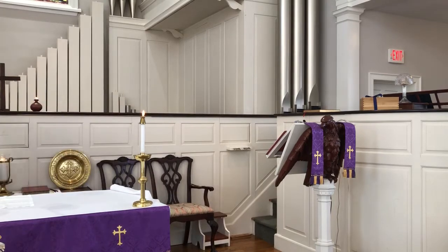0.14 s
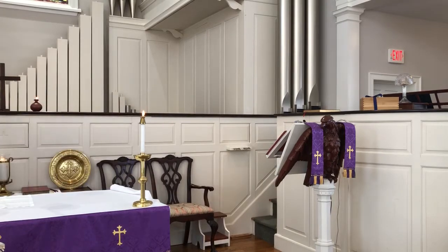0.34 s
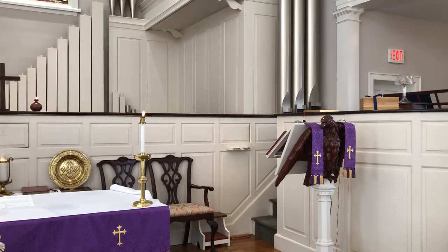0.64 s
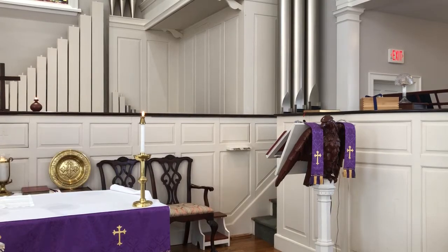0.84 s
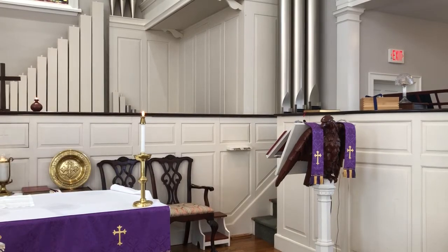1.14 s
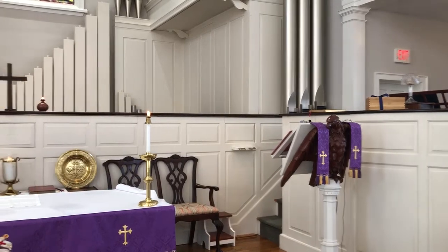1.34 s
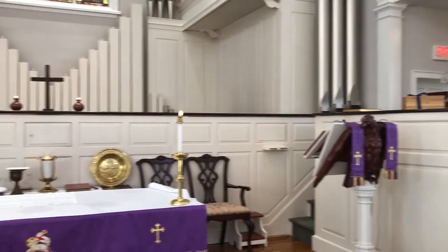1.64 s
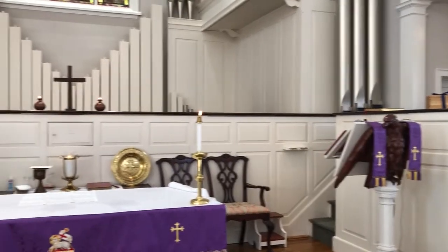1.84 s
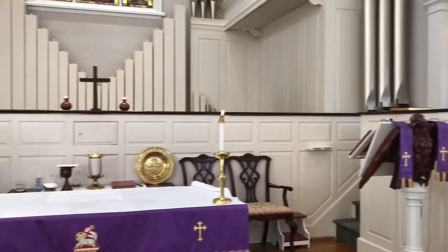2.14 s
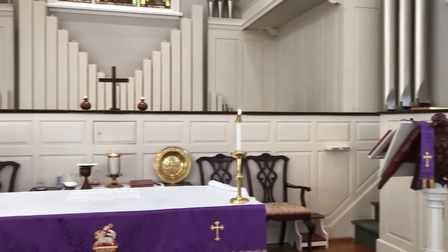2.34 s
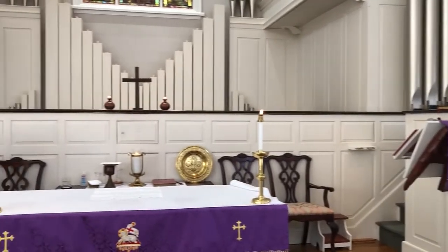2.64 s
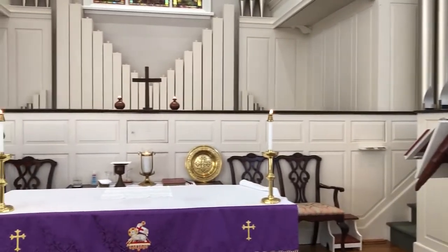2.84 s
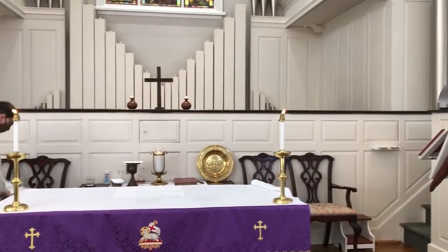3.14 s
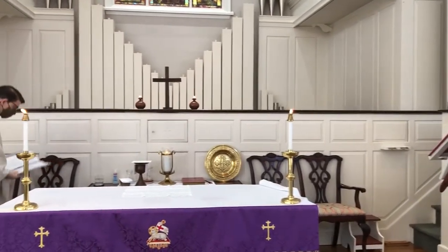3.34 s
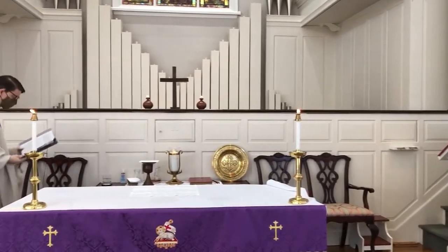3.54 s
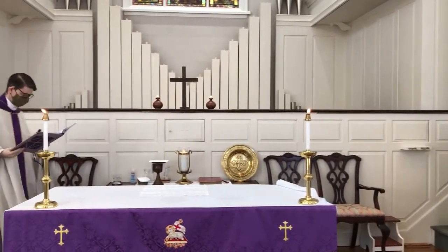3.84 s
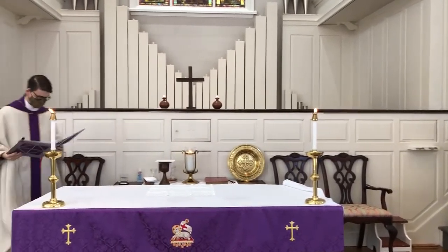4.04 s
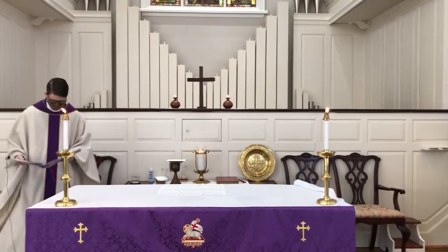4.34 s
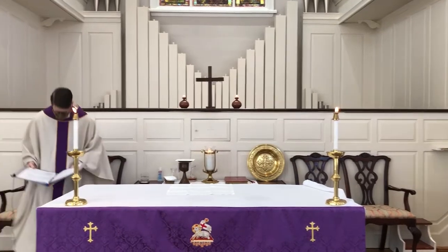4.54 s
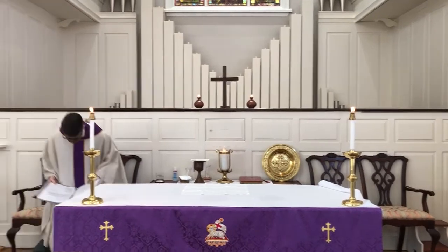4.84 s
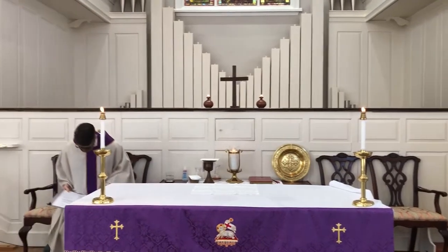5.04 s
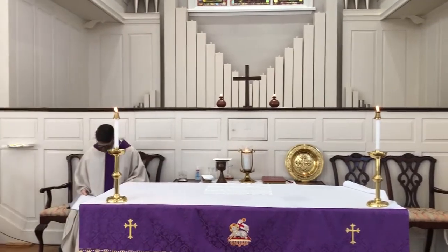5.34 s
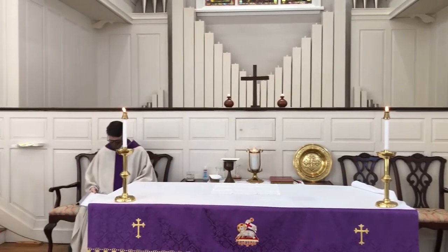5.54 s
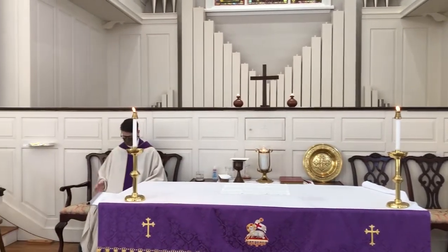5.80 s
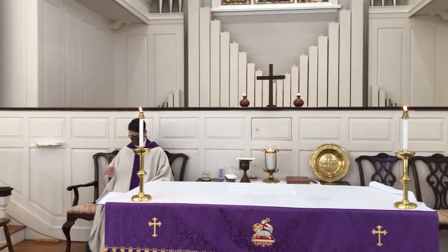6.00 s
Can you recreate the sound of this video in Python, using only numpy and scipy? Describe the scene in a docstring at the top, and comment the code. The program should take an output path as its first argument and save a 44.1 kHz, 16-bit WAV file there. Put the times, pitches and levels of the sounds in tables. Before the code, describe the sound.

In a hushed, echoing hall, a few hollow footsteps, dry handling taps and scrapes up close, then a wooden chair bump, creaks and rustling robe.

```python
"""Footsteps, a chair and a hand-held camera in a hall

Footsteps boom in a quiet hall's wooden floor, made from dying sines and short bursts of noise.
A robed person knocks a wooden chair and sits down: ringing wood, creaks, brushing cloth and paper.
Fingers tap and slide on the camera's case, made from ringing panels and grainy noise, over air and rumble.
The far sounds echo in the hall; the camera sounds stay dry. Table levels are relative: each source trims them.
"""
import sys
import numpy as np
from scipy import signal
from scipy.fft import rfft, irfft
from scipy.io import wavfile

SR = 44100
rng = np.random.default_rng(int(sys.argv[2]) if len(sys.argv) > 2 else 0)


def dump(signal):
    """Clip the signal to [-1, 1] and save it as 16-bit WAV at the path in sys.argv[1]."""
    limited = np.clip(np.atleast_2d(signal).T, -1, 1)
    pcm = np.round(limited * 32767).astype(np.int16)
    wavfile.write(sys.argv[1], SR, pcm)


N = 272052
TIME = np.arange(N) / SR  # s


def amp(db):
    """Turns decibels into a gain."""
    return 10 ** (np.asarray(db) / 20)


def unit(x):
    """Scales a sound to rms 1."""
    return x / np.sqrt(np.mean(x ** 2) + 1e-20)


def read(points, hz):
    """Reads a table between its points, along a log-frequency axis."""
    f, value = np.transpose(points)
    return np.interp(np.log(hz + 1), np.log(f + 1), value)


def add(mix, s, sound):
    """Mixes a sound in at time s, in seconds."""
    part = mix[max(round(s * SR), 0):][:len(sound)]
    part += sound[:len(part)]


def colour(x, spectrum):
    """Filters with the given spectrum, with no sound ahead of its cause (minimum phase)."""
    size = 8192
    hz = abs(np.fft.fftfreq(size, 1 / SR))
    log_gain = np.log(amp(np.maximum(read(spectrum, hz), -100)))
    response = np.exp(np.conj(signal.hilbert(log_gain)))
    taps = np.fft.ifft(response).real[:size // 2]
    return signal.fftconvolve(x, taps)[:len(x)]


def noise(spectrum):
    """Makes steady noise of rms 1 with the given spectrum."""
    gain = amp(read(spectrum, np.fft.rfftfreq(N, 1 / SR)))
    return unit(irfft(rfft(rng.standard_normal(N)) * gain, N))


def wobble(top_hz):
    """Makes a slow random curve of rms 1, fading out in pitch around top_hz."""
    gain = np.exp(-(np.fft.rfftfreq(N, 1 / SR) / top_hz) ** 2)
    return unit(irfft(rfft(rng.standard_normal(N)) * gain, N))


def ring(modes, stretch=1, tilt_db=0):
    """A struck body rings as a sum of dying sines; tilt_db brightens it, in dB per octave."""
    t = np.arange(SR * 3 // 4) / SR
    centre = np.median([mode[0] for mode in modes])
    out = 0
    for hz, db, t60 in modes:
        level_db = db + tilt_db * np.log2(hz / centre) - 60 * t / t60
        out = out + amp(level_db) * np.sin(2 * np.pi * hz * stretch * t)
    return out


def burst(spectrum, t60, clatter):
    """A contact is one sharp edge plus a dying clatter, with the energy of 3 ms at rms 1."""
    t = np.arange(SR // 3) / SR
    drive = clatter * rng.standard_normal(len(t)) * amp(-60 * t / t60)
    drive[0] += 1
    out = colour(drive, spectrum)
    return out * np.sqrt(SR * 3 // 1000) / np.linalg.norm(out)


def clicks(rows, spectrum, t60, clatter):
    """Something thin and stiff gives single sharp snaps."""
    out = np.zeros(N)
    for s, db in rows:
        add(out, s, amp(db) * burst(spectrum, t60, clatter))
    return out


def friction(per_s, spread_db, smooth):
    """Rubbing gives tiny slips of uneven size, at random times, over a smooth hiss."""
    happens = rng.random(N) < per_s / SR
    size = rng.standard_normal(N) * amp(spread_db * np.minimum(rng.exponential(1, N), 4))
    return unit(unit(happens * size) + smooth * rng.standard_normal(N))


def rub(gain, spectrum):
    """Two soft surfaces brush with a dense, fine grain."""
    grain = friction(per_s=6000, spread_db=1.5, smooth=1.2)
    return gain * unit(colour(grain, spectrum))


def judder(hz, drift, top_hz):
    """Stick and slip gives short groans whose pitch wanders at random."""
    turns = np.cumsum(hz * np.exp(drift * wobble(22))) / SR
    return unit(wobble(top_hz) * np.sin(2 * np.pi * turns))


def swells(rows, index=2):
    """Gives the gain of free movements, each rising and falling in one smooth arch."""
    power = np.zeros(N)
    for row in rows:
        start, length = row[:2]
        arch = np.sin(np.pi * np.clip((TIME - start) / length, 0, 1))
        power += (amp(row[index]) * arch) ** 2
    return np.sqrt(power)


def footsteps():
    """Each heel clicks, the sole lands just after, and the boards boom as they take the weight."""
    # footfalls: t/s, thud of the boards/dB, heel click/dB
    footfalls = [(0.4416, -44.5, -52), (0.824, -60, -65.5), (1.384, -79, -65.5), (1.473, -50, -74),
                 (1.6666, -26.5, -38), (2.214, -62, -65.5)]
    # ringing of the sprung floor: f/Hz, level/dB, time to die by 60 dB/s
    boards = [(69.4, -0.5, 0.39), (93.05, -6, 0.62), (110.6, -6, 0.33), (125.2, -3.5, 0.27),
              (156, -13.5, 0.085), (300, -15.5, 0.15), (377, -12, 0.078), (494, -17.5, 0.092),
              (561, -13.5, 0.061), (766, -15, 0.051)]
    # tone of heel and sole: f/Hz, level/dB
    heel = [(100, -2), (260, -1), (550, -3), (800, -4), (1050, -5.5), (1300, -7), (1650, -11.5),
            (2600, -12), (3600, -19), (5100, -22), (6200, -29.5), (8000, -28), (16000, -54)]
    build_cycles = 0.64  # time constant of each mode's build-up, in its own cycles
    sole_lag_s = 0.0028

    out = np.zeros(N)
    t = TIME[:len(ring(boards))]
    boom = 0
    for hz, db, t60 in boards:
        build_up = 1 - np.exp(-t * hz / build_cycles)
        boom = boom + ring([(hz, db, t60)]) * build_up
    for s, thud_db, heel_db in footfalls:
        add(out, s, amp(thud_db - 0.3) * boom)
        add(out, s, amp(heel_db - 12.5) * burst(heel, t60=0.028, clatter=0.85))
        add(out, s + sole_lag_s, amp(heel_db + 2.5) * burst(heel, t60=0.057, clatter=0.96))
    return out


def chair():
    """Wood knocks on wood and the frame rings; short bursts make the creaks and one footstep's sharp tick."""
    # the chair is bumped and rocks: t/s, thump of the frame/dB, clack/dB
    bumped = [(4.3694, -33.5, -38), (4.3756, -46, -37.5), (4.3813, -46, -40.5), (4.402, -36.5, -45.5),
              (4.434, -49, -44)]
    # ringing of the frame and the floor under it: f/Hz, level/dB, time to die by 60 dB/s
    frame = [(60.3, -5.5, 0.36), (107.7, -6, .25), (139, -18.5, 0.24), (195.4, -14, 0.21), (281, -16, 0.15),
             (360, -11, 0.038), (913, -4.5, 0.016)]
    # tone of the clack: f/Hz, level/dB
    wood = [(60, 2), (130, 14), (200, 0.5), (380, -1), (560, -8), (950, -5), (1300, -11), (1750, -15.5),
            (2400, -22), (4000, -26), (6400, -30.5), (8000, -38), (16000, -58)]
    # creaks of the joints, and first the sharp tick of a footstep: t/s, level/dB
    ticks_and_creaks = [(0.4414, -50), (3.5748, -63), (3.739, -64.5), (5.407, -59), (5.43, -63),
                        (5.574, -58), (5.604, -49.5), (5.6323, -50.5), (5.6346, -61), (5.64, -52),
                        (5.808, -56), (5.838, -55.5)]
    # tone of these ticks and creaks: f/Hz, level/dB
    creak_tone = [(300, -20), (900, -2.5), (1700, 1.5), (2800, -4.5), (4000, -8), (6000, -13), (9000, -20),
                  (16000, -42)]

    knocks, creaks = np.zeros(N), np.zeros(N)
    for s, thump_db, clack_db in bumped:
        add(knocks, s, amp(clack_db + 1.5) * burst(wood, t60=0.076, clatter=0.5))
        add(knocks, s, amp(thump_db - 0.5) * ring(frame))
    for s, db in ticks_and_creaks:
        add(creaks, s, amp(db - 1) * burst(creak_tone, t60=0.021, clatter=0.17))
    return knocks, creaks


def robe():
    """Heavy cloth brushes over itself and the chair, and soft soles shuffle on the boards."""
    # the robe swings as the sitter turns, sits and settles: start t/s, length/s, level/dB
    robe_swings = [(4.7, 0.57, -88.5), (5.19, 0.2, -77), (5.37, .24, -78), (5.52, 0.23, -75),
                   (5.64, 0.3, -80.5)]
    # tone of the cloth: f/Hz, level/dB
    cloth_tone = [(120, -22.5), (370, 4.5), (560, -1.5), (660, -8), (810, 4.5), (1080, -11), (1550, -2),
                  (2300, -9), (3400, -16), (4450, -13.5), (5600, -17), (7000, -14), (10000, -22.5),
                  (16000, -31)]
    # shuffles of the feet: start t/s, length/s, level/dB
    shuffles = [(3.55, 0.15, -66), (3.7, 0.066, -64.5)]
    # tone of the soles: f/Hz, level/dB
    sole_tone = [(200, -10), (380, 5.5), (500, 4.5), (640, -4), (800, 5), (1020, -6.5), (1300, -10),
                 (1650, -7), (2300, -12), (3500, -31), (8000, -28), (16000, -49)]

    swinging = rub(swells(robe_swings), cloth_tone)
    shuffling = rub(swells(shuffles), sole_tone)
    return amp(13) * swinging + amp(0.5) * shuffling


def pages():
    """The stiff pages of a booklet snap as they buckle, and slide over each other."""
    # snaps: t/s, level/dB
    snap_times = [(4.9357, -52.5), (4.952, -48), (4.986, -63), (5.277, -47.5), (5.2888, -43.5),
                  (5.639, -54.5)]
    # tone of a snap: f/Hz, level/dB
    paper_tone = [(300, -2.5), (1800, 1), (3000, -4), (4400, 0), (6000, -12.5), (8500, -0.5), (11000, -12),
                  (16000, -9.5)]
    # slides of a page over its neighbour: start t/s, length/s, level/dB
    page_slides = [(3.85, 0.086, -68.5), (4.99, 0.1, -78.5)]
    # tone of a slide: f/Hz, level/dB
    leaf_tone = [(400, -5), (1000, -4), (1800, -2.5), (2700, -8), (4000, -1), (4700, -5), (5600, -7),
                 (8000, -14), (16000, -31)]

    snaps = clicks(snap_times, paper_tone, t60=0.011, clatter=0.06)
    return amp(-7.0) * snaps + rub(swells(page_slides), leaf_tone)


def finger_taps():
    """A finger's slip pushes the whole case and rings its panels; the palm bumps and a nail flicks."""
    # fingers stick and slip on the case: t/s, dull push/dB, sharp edge/dB
    taps = [(2.616, -44, -23.5), (2.7985, -41, -38), (2.8033, -57, -36), (2.8095, -46, -24),
            (2.9427, -43.5, -39), (3.011, -47, -58), (3.0285, -40.5, -47), (3.0706, -37, -42),
            (3.0915, -31, -43), (3.0957, -62, -32.5), (3.1072, -32.5, -35), (3.129, -28.5, -40),
            (3.135, -29.5, -33.5), (3.1387, -30, -60), (3.1645, -31, -33), (3.1767, -30, -39),
            (3.1872, -36.5, -45), (3.860, -33.5, -45.5), (3.989, -37, -54), (4.241, -33.5, -44.5),
            (5.3237, -33.5, -35), (5.3295, -38, -45.5)]
    # ringing of the case as a whole: f/Hz, level/dB, time to die by 60 dB/s
    case = [(411, 2, 0.027), (527, -2, 0.012), (267, -47, 0.0053)]
    # ringing of its panels: f/Hz, level/dB, time to die by 60 dB/s
    panels = [(1145, 4.5, 0.0064), (1650, 3, 0.011), (2240, -3.5, 0.0095), (2850, -15, 0.0056),
              (3500, -9, 0.0038), (4250, -10.5, 0.013), (7140, -6, 0.0044), (8900, -15, 0.0033)]
    # the palm shifts its grip: t/s, level/dB, f/Hz
    palm_bumps = [(2.6304, -27, 115.6), (2.746, -36, 124), (2.7758, -35.5, 155), (2.86, -42.5, 376),
                  (5.318, -44, 230)]
    # soft skin blunts each tap: f/Hz, level/dB
    fingertip = [(100, -2), (4500, 3), (6000, -7.5), (10000, -10), (12500, -29), (16000, -44)]
    # a fingernail flicks the edge of the case: t/s, level/dB
    flicks = [(2.7745, -45.5), (2.7775, -47), (2.8005, -39.5), (2.8112, -58), (2.8243, -44.5)]
    # tone of a flick: f/Hz, level/dB
    nail = [(500, 13.5), (2000, 10), (4400, -5), (6000, -14), (9000, -2), (12000, -8), (16000, -18)]

    out = np.zeros(N)
    usual_db = np.median([tap[2] for tap in taps])
    chances = rng.standard_normal((len(taps), 2))  # each tap is slightly off in pitch
    for (s, push_db, edge_db), (low, high) in zip(taps, chances):
        add(out, s, amp(push_db - 6.0) * ring(case, 1 + 0.023 * low))
        tilt_db = 0.1 * (edge_db - usual_db)  # a sharper tap is brighter
        add(out, s, amp(edge_db - 11.5) * ring(panels, 1 + 0.04 * high, tilt_db))

    t = np.arange(SR // 10) / SR
    swell = t / 0.0041  # a bump peaks after 4.1 ms
    for s, db, hz in palm_bumps:
        add(out, s, amp(db - 1) * swell * np.exp(1 - swell) * np.sin(2 * np.pi * hz * t))
    nail_flicks = clicks(flicks, nail, t60=0.013, clatter=0.37)
    return colour(out, fingertip) + amp(-4.5) * nail_flicks


def strokes():
    """Each stroke grips, holds and lets go; gives the gains of drag, scratch, ring and hiss over time."""
    # strokes over the case: start t/s, length/s, low drag/dB, scratch/dB, panel ring/dB, skin hiss/dB
    stroke_rows = [(2.325, 0.061, -53, -68, -95, -100), (2.423, 0.027, -51.5, -66, -91, -98),
                   (2.434, 0.2, -58.5, -58, -69, -83), (2.513, 0.058, -48, -79, -80, -95),
                   (2.625, 0.077, -62, -63.5, -79, -83), (2.74, 0.057, -51, -63, -68.5, -86),
                   (2.79, 0.021, -51.5, -46.5, -65, -82), (2.819, 0.075, -69, -64, -78, -61),
                   (2.849, .028, -49, -57, -84, -75), (2.927, 0.042, -66, -63, -74, -90),
                   (2.977, 0.13, -59.5, -65.5, -75, -92), (3.066, .12, -53.5, -65.5, -75, -78),
                   (3.177, 0.14, -69, -75, -87, -77), (3.303, 0.095, -78, -69.5, -84, -83),
                   (5.245, 0.098, -71, -69, -73.5, -74), (5.924, .1, -65.5, -68, -91, -66.5),
                   (6.01, 0.18, -66.5, -68.5, -75, -70)]
    grip_share = 0.24  # part of a stroke over which the finger takes hold
    release_s = 0.014  # time constant of the letting go

    power = np.zeros((4, N))
    for start, length, *levels_db in stroke_rows:
        t = TIME - start
        grip = np.clip(t / (grip_share * length), 0, 1)
        release = np.exp(-np.clip(t - length, 0, 1) / release_s)
        power += np.outer(amp(levels_db), grip * release) ** 2
    return np.sqrt(power)


def finger_slides():
    """Skin drags over the case: a low shudder, a scratch that rings one panel, and a fine hiss."""
    # tone of the low drag: f/Hz, level/dB
    drag_tone = [(60, 0.5), (130, 2), (250, -8.5), (340, 0.5), (430, -16), (550, -12.5), (750, -19.5),
                 (1500, -40), (4000, -85)]
    # tone of the scratch: f/Hz, level/dB
    scratch_tone = [(250, -20), (480, 0.5), (650, -5.5), (830, 1), (1100, -6.5), (1350, -7.5), (1650, -4),
                    (2100, -9), (3300, -26), (4300, -18.5), (5800, -30.5), (7500, -21.5), (10000, -31.5),
                    (16000, -43)]
    # the ringing panel: centre f/Hz, width/Hz
    case_ring = (4500, 600)
    # tone of the skin hiss: f/Hz, level/dB
    skin_tone = [(2000, -11), (6000, -7), (9000, -6.5), (12500, -3), (14500, -7.5), (16000, 0)]

    slips = friction(per_s=900, spread_db=2.5, smooth=0.8)
    slips = slips * amp(1.8 * wobble(60))  # uneven strength

    hz, width = case_ring
    panel_drive = colour(slips, [(2500, -19), (4300, 7.5), (4700, 5), (5800, -25)])  # f/Hz, level/dB
    panel = unit(signal.lfilter(*signal.iirpeak(hz, hz / width, SR), panel_drive))

    scratch_groan = judder(970, drift=0.12, top_hz=126)
    scratch = unit(unit(colour(slips, scratch_tone)) + 0.41 * scratch_groan)

    drag_grain = friction(per_s=220, spread_db=-1.0, smooth=1.0)
    drag_groan = judder(260, drift=0.13, top_hz=30.8)
    drag = unit(unit(colour(drag_grain, drag_tone)) + 0.8 * drag_groan)

    drag_gain, scratch_gain, ring_gain, hiss_gain = strokes()
    return (amp(-1.5) * drag_gain * drag
            + amp(0.5) * scratch_gain * scratch
            + amp(-2.5) * ring_gain * panel
            + amp(-1.0) * rub(hiss_gain, skin_tone))


def background():
    """The still air of the hall is steady noise; the swaying camera adds deep, swelling rumble."""
    # tone of the air: f/Hz, level/dB
    air_tone = [(12, -33.5), (20, 1), (53, -22.5), (123, -19.5), (150, -24.5), (182, -24), (285, -33.5),
                (328, -31.5), (377, -32), (698, -41), (873, -39.5), (1090, -40), (1330, -41.5),
                (2320, -46.5), (16000, -60.5)]
    # the hand moves the camera: start t/s, length/s, slow lean/dB, rumble/dB
    sways = [(-.1, 0.19, -42, -46.5), (.2, 0.38, -58, -45.5), (.68, 0.28, -57, -49),
             (1.4, 0.57, -55.5, -44.5), (2.1, 0.25, -64, -56), (2.55, .35, -46, -37),
             (2.84, 0.49, -24.5, -52), (3.26, 0.3, -35.5, -45.5), (3.6, 0.42, -37, -68),
             (4.32, 0.17, -31, -41.5), (4.45, 1, -51, -62), (5.18, 0.33, -36, -60)]
    steady_lean_db, steady_rumble_db = -53.5, -66  # the hand is never quite still

    # both: f/Hz, level/dB
    sway = noise([(1, -20), (4, 0), (9, -2), (20, -16), (40, -50), (100, -95)])
    rumble = noise([(12, -37), (28, 0.0), (50, -4.0), (75, -14.0), (130, -28.5), (400, -70)])
    lean = amp(steady_lean_db) + amp(-6.5) * swells(sways)
    shake = amp(steady_rumble_db) + amp(-6.5) * swells(sways, index=3)
    return amp(-61) * noise(air_tone) + lean * sway + shake * rumble


def hall(x):
    """Many echoes merge into a dense tail in which each band dies at its own speed."""
    # dying of the echoes: f/Hz, time to die by 60 dB/s
    decay = [(80, 0.98), (210, 1.11), (560, 1.44), (1470, 1.64), (3900, 1.55), (12000, 0.58)]
    # tone of the echoes: f/Hz, level/dB
    echo_tone = [(60, -8), (200, 3.5), (900, -5), (2000, -4.5), (5000, -10), (14000, -1)]

    hz, t, z = signal.stft(rng.standard_normal(SR * 2), SR, nperseg=512)
    z = z * amp(-60 * t / read(decay, hz)[:, None])
    tail = signal.istft(z, SR, nperseg=512)[1]
    tail *= 1 - np.exp(-np.arange(len(tail)) / SR / 0.0033)  # the echoes set in over a few ms
    tail = colour(tail / np.linalg.norm(tail), echo_tone)
    return signal.fftconvolve(x, tail)[:N]


def scene():
    """Far sounds fill the hall; those on the camera stay dry."""
    steps = footsteps()
    knocks, creaks = chair()
    paper, cloth = pages(), robe()
    far = steps + knocks + creaks + paper + cloth
    wet = hall(amp(-11) * steps + amp(-2.5) * knocks + amp(-14.5) * creaks
               + amp(-14.5) * paper + amp(-11) * cloth)
    return (far + wet + finger_taps() + finger_slides() + background())[None]


def record(dry):
    """Fades the sound in over 10 ms and removes the highest treble."""
    edge_hz = 15850
    eased = dry * np.minimum(TIME / 0.01, 1)
    low_pass = signal.firwin(511, edge_hz, window=("kaiser", 9), fs=SR)
    return signal.oaconvolve(eased, low_pass[None], "same")


dry = scene()
out = record(dry)
dump(out)
```